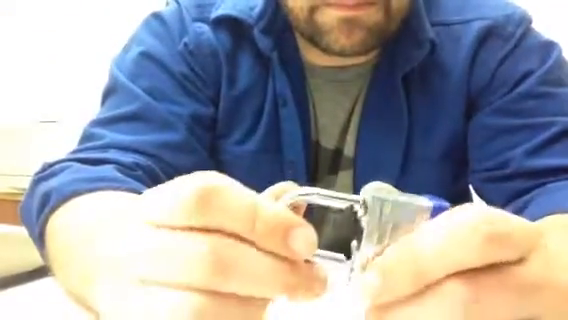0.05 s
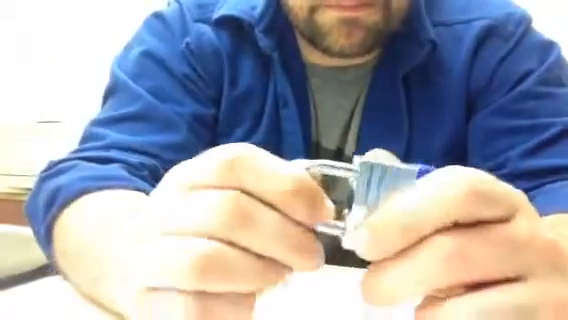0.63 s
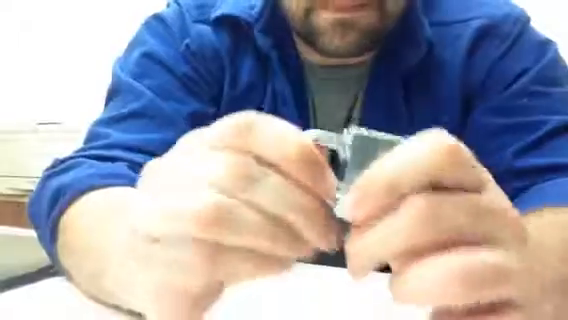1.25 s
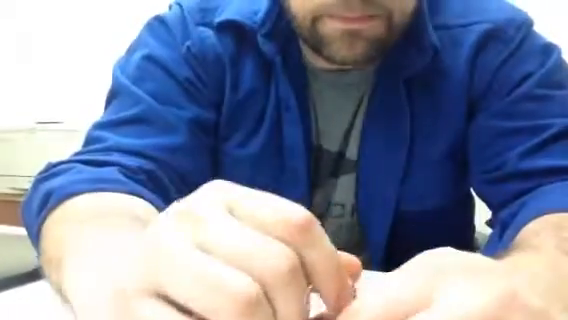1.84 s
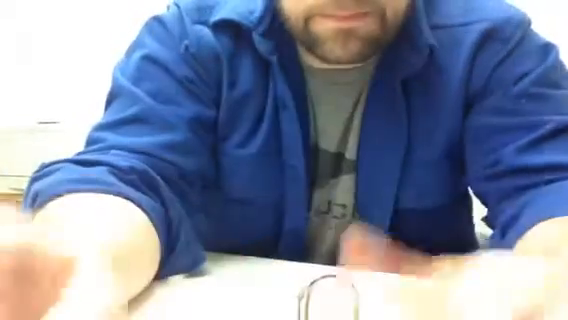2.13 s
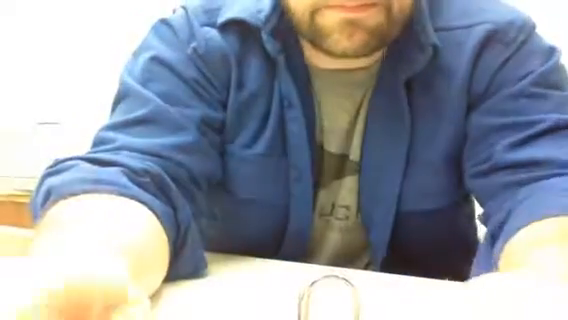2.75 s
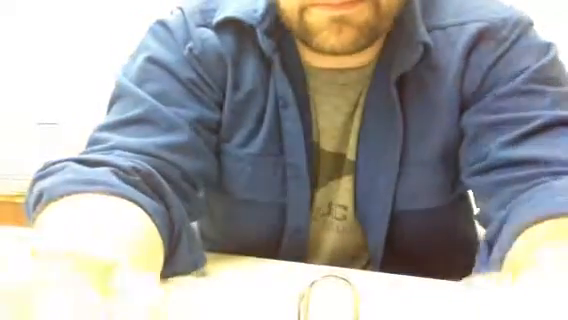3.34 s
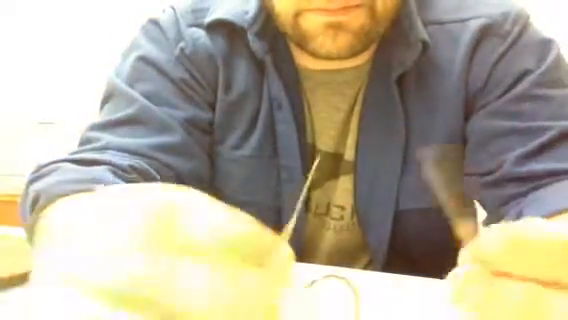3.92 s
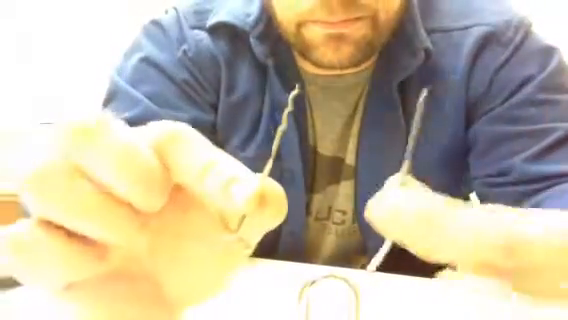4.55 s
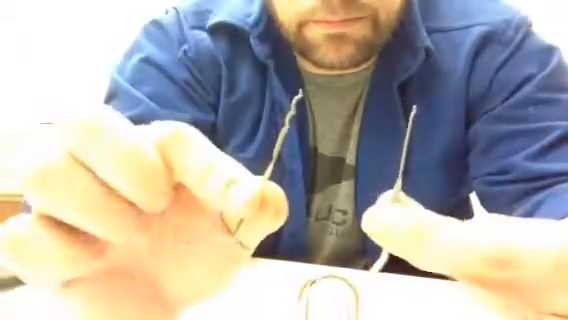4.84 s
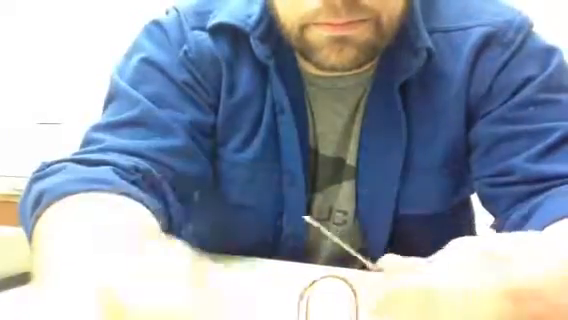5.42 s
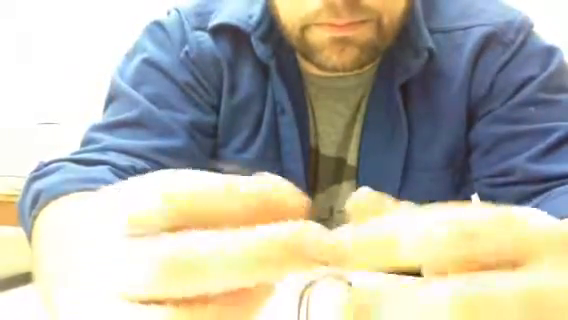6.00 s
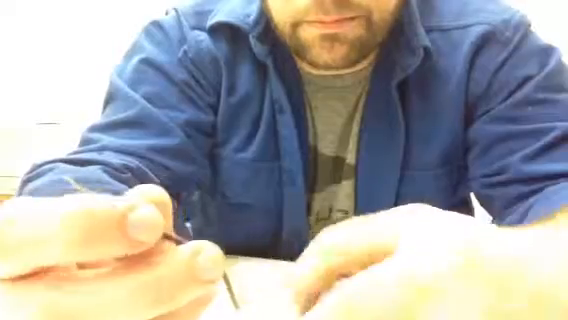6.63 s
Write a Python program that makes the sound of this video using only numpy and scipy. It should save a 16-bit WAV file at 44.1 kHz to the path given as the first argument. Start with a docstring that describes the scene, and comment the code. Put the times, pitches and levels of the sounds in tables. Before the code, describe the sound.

A padlock clacks shut and knocks onto a table, then thin steel picks tap and one drops with a jingle.

```python
"""A small room, one close microphone at a table, a fan humming low throughout.
First a padlock, held up in the hand, is snapped shut and tugged so that its shackle clacks on the body.
Near 1.8 s it is set down close to the microphone and the table top knocks. Hands slide over the top
and gather two thin steel picks, which scrape, tap, click under the nails and squeak faintly.
Near 5.4 s one pick is dropped and jingles to rest; last, the lock is nudged along the table."""
import sys
import numpy as np
from scipy import signal
from scipy.fft import rfft, irfft
from scipy.io import wavfile

SR = 44100
rng = np.random.default_rng(int(sys.argv[2]) if len(sys.argv) > 2 else 0)


def wrap_up_sound(samples):
    """Save the sound to the file named by the first command line argument, as 16-bit audio."""
    columns = np.atleast_2d(samples).T
    # keep every value between -1 and 1, then stretch to whole-number steps
    tamed = np.clip(columns, -1, 1)
    steps = np.round(tamed * 32767).astype(np.int16)
    wavfile.write(sys.argv[1], SR, steps)


N = 294147
TIME = np.arange(N) / SR

# Levels are relative within each table.
# spectra of the fan's rumble and rush: f/Hz, level/dB
FAN_RUMBLE = [(20, -34.5), (35, -20), (52, -2), (80, -3.5), (140, -1.5), (180, -1), (215, -6), (310, -9.5),
              (420, -15), (560, -18.5), (800, -23.5), (1230, -31), (2700, -35), (5700, -42), (14500, -38.5)]
FAN_RUSH = [(120, -15), (300, -9), (410, 5.5), (560, -4), (740, -1), (950, -6.5)]
# tones of the fan's hum: f/Hz, level/dB
FAN_HUM = [(53, -65), (175, -60.5), (400, -78)]
# loose parts ticking as the lock is moved: t/s, level/dB, decay/ms
LOCK_TICKS = [(0.1203, -60.5, 4.4), (0.1896, -63, 11), (0.432, -61.5, 2.6), (0.767, -57, 2.2),
              (1.002, -55, 1.8), (1.248, -62, 4.4), (1.8366, -34.5, 1.6), (1.92, -46, 1.6),
              (1.9325, -41, 1), (6.182, -62, 1.35)]
# shackle striking the lock body: t/s, level/dB, thud re level/dB, decay/ms, shackle f/Hz,
# shackle gain/dB, spring f/Hz, spring gain/dB, lead of the free-play tick/ms
SHACKLE_CLACKS = [(0.2115, -12.5, 0, 1.54, 3780, 3.5, 10450, 7.5, 4),
                  (0.217, -24, -16, 2.2, 3500, 1, 13300, 6, -7),
                  (0.267, -13, 3.5, 2, 4270, 0.5, 9800, -16, 5),
                  (0.2696, -26, 1.5, 2.8, 4800, -4, 14000, 1, 5),
                  (0.4951, -32.5, -29, 1.8, 3880, 2, 14500, 12, 2.5),
                  (0.787, -25, -27, 1.5, 4370, 7, 14700, 8, 8.5),
                  (0.9058, -23.5, -1.5, 1.94, 3600, 2, 13500, 3, 1.5),
                  (1.041, -22.5, -10, 1.05, 3700, 8, 13400, 2, 6.5),
                  (1.1345, -21.5, 0, 1.8, 4530, -2, 13600, 4, 5.5),
                  (1.2742, -28, 3.5, 1.62, 6300, 8, 12500, -14, 8),
                  (1.3918, -27.5, -8, 2.86, 4200, -10, 12800, -6, 10.5)]
# faint after-ring of the shackle: f/Hz, level/dB, t60/s
SHACKLE_MODES = [(3010, -9.5, .18), (4200, -2.5, .2), (4440, 0, 0.093), (4900, -6.5, 0.2), (7300, -1.5, .2),
                 (8400, -6, .2)]
# spectrum of the lock's bright steel: f/Hz, level/dB
STEEL_COLOUR = [(600, -30.5), (1000, -16), (1500, -15.5), (2200, -13.5), (3200, -6.5), (5500, -7.5),
                (6700, -3), (9400, -1), (11400, -2), (13000, 0), (15300, -6)]
# spectrum of the lock body's thud: f/Hz, level/dB
THUD_COLOUR = [(100, -19), (250, -6), (450, 2.5), (800, -9), (1500, -6.5), (2600, -14.5)]
# spectrum of the room's tail: f/Hz, level/dB
TAIL_COLOUR = [(200, -13), (1500, -0.5), (4500, -2.5), (8000, -2.5), (15000, -2)]
# spectrum of the clacks scattered back by the room: f/Hz, level/dB
SCATTER_COLOUR = [(200, -14.5), (1200, -13.5), (2400, -10), (3400, -7), (4600, 0.5), (6000, -3.5),
                  (7700, -1), (10000, 0), (13000, 1.5), (15000, 2.5)]
# blows on the table top: t/s, level/dB, contact low-pass f/Hz
TABLE_KNOCKS = [(1.8360, -20.5, 2350), (1.9157, -19.5, 1500), (1.919, -29, 1390), (1.9286, -18, 1000),
                (1.9323, -22.5, 1480), (1.9392, -27, 1300), (5.241, -32, 654)]
# modes of the table top: f/Hz, level/dB, t60/s
TABLE_MODES = [(178.6, -3.5, 0.17), (240, -1.5, 0.15), (336, -11, 0.076), (390.5, 1.5, 0.076),
               (483, -2.5, 0.1), (546, -11.5, 0.16), (637.7, -11.5, 0.37), (720, -2, 0.11), (758, -1, 0.13),
               (842, -11, 0.2), (924, -8, 0.15), (962.5, -1.5, 0.089), (1052, -7.5, .05), (1177, -2, 0.085),
               (1275, -17.5, 0.093), (1355, -12.5, 0.074), (1660, -27, 0.086), (1878, -34.5, 0.036)]
# the lock dragged over the table: start t/s, length/s, level/dB
LOCK_DRAGS = [(1.837, 0.068, -33.5), (1.937, 0.069, -45), (6.47, 0.11, -31), (6.65, 0.036, -38.5)]
# spectra of a knock and of a drag: f/Hz, level/dB
KNOCK_COLOUR = [(90, -3), (220, -5), (900, -1), (1500, -10.5), (2400, -18), (6000, -17)]
DRAG_COLOUR = [(100, -10), (210, -11), (380, 2.5), (480, 4), (700, -7.5), (1200, -8), (1900, -9),
               (2500, -21), (6000, -32.5), (12000, -37)]
# hands sweeping the table: start t/s, length/s, fastest point/share of length, level/dB, treble/dB
HAND_STROKES = [(1.937, 0.77, 0.67, -63, -8.5), (2.824, 0.4, 0.34, -58, -15), (3.429, 0.29, 0.28, -59, -11),
                (3.818, .27, 0.27, -62, -9)]
# spectrum of friction on the table: f/Hz, level/dB
RUB_COLOUR = [(880, -33), (1500, -3.5), (2090, -1), (3060, -2), (4850, -2), (6010, -5.5), (12900, -3.5),
              (14300, -1), (15500, -6.5)]
# picks scraping over the table: start t/s, length/s, level/dB, treble/dB, ring re level/dB
PICK_SCRAPES = [(2.46, 0.13, -60, -7, -9), (2.767, 0.069, -75.5, -1, -15), (3.178, 0.044, -58.5, -1, -4),
                (3.247, 0.1, -72.5, -6, -13), (3.35, .06, -71, 5, -20), (3.586, .045, -55, 0, -18),
                (3.654, 0.023, -65, 3, -15), (3.71, 0.1, -73.5, -4.5, -18)]
# modes of a steel pick: f/Hz, level/dB, t60/s
PICK_MODES = [(3660, -3.5, .17), (4922, -9, .1), (8376, -16, .13), (9320, -8, .13), (11803, 0, .13),
              (14088, 0, .14)]
# picks striking the table: t/s, tap level/dB, ring level/dB, decay/ms, f/Hz favoured by the contact
PICK_CONTACTS = [(2.475, -58, -68, 3.3, 9320), (2.5363, -49, -58, 2.2, 11800), (2.56, -45, -54, 3, 9320),
                 (2.585, -44.5, -53, 3, 11800), (2.607, -46, -67, 2, 11800), (3.583, -33, -40, 5.5, 11800),
                 (3.601, -34.5, -48, 5.2, 9320), (5.2259, -25.5, -55, 1.7, 5010),
                 (5.2424, -38, -60, 3.3, 4922), (5.360, -36, -38, 4.3, 14090),
                 (5.3687, -12, -27, .8, 12100), (5.3841, -20, -25.5, 1, 14090), (5.393, -25, -32, .9, 3660)]
# spectrum of a pick's tap: f/Hz, level/dB
TAP_COLOUR = [(500, -6), (1200, -14.5), (2000, -4), (3300, -8), (5000, -1.5), (7000, -2.5), (9500, 1.5),
              (12000, -3), (15000, -5)]
# fingernails on a pick that lies flat: t/s, level/dB, decay/ms, low-cut f/Hz
NAIL_CLICKS = [(3.182, -39, 1.6, 1500), (3.2512, -35.5, 0.91, 7000), (3.265, -49, 1.5, 7000),
               (3.409, -31.5, 1.53, 200), (3.7221, -61.5, 1.8, 5000)]
# resonances of that damped pick: f/Hz, width/Hz, level/dB
FLAT_PICK_BANDS = [(780, 61, 8.5), (3280, 1200, -9), (7380, 540, -9), (11000, 1230, 2.5), (14300, 650, -14)]
# sliding steel squeaking: start t/s, length/s, top of the pitch arch t/s, its f/Hz, level/dB
PICK_SQUEAKS = [(3.735, .085, 3.705, 15200, -69), (3.87, 0.32, 3.96, 14800, -69.5)]


def undb(db):
    """Decibels to gain."""
    return 10 ** (np.asarray(db) / 20)


def unit(x):
    """Scale to rms 1."""
    return x / np.sqrt(np.mean(x ** 2))


def add(track, s, sound):
    """Mix a sound in at time s."""
    i = int(s * SR)
    track[i:i + len(sound)] += sound[:N - i]


def colour(x, points, size=2048):
    """Causal filter through (f/Hz, level/dB) points that keeps the power of white noise."""
    hz, db = np.transpose(points)
    grid = np.maximum(np.fft.rfftfreq(size, 1 / SR), 1)
    cepstrum = irfft(np.log(undb(np.interp(np.log(grid), np.log(hz), db))))
    cepstrum[1:size // 2] *= 2  # fold to minimum phase
    cepstrum[size // 2 + 1:] = 0
    response = irfft(np.exp(rfft(cepstrum)))
    return signal.fftconvolve(x, response / np.linalg.norm(response))[:len(x)]


def cut(x, hz, kind="low", order=2):
    """Low- or high-pass."""
    return signal.sosfilt(signal.butter(order, hz, kind, fs=SR, output="sos"), x)


def resonate(x, hz, width):
    """One broad resonance with gain 1 at its centre."""
    return signal.lfilter(*signal.iirpeak(hz, hz / width, fs=SR), x)


def walk(rate):
    """Random wander of rms 1, with `rate` turns a second."""
    knots = rng.standard_normal(int(N / SR * rate) + 2)
    return unit(np.interp(TIME * rate, np.arange(len(knots)), knots))


def patter(rate, spread_db):
    """Tiny impacts at random moments, about `rate` a second."""
    return (rng.random(N) < rate / SR) * undb(spread_db * rng.standard_normal(N))


def crack(decay_ms, rise_ms=0.15):
    """Countless damped modes struck at once: a noise burst that dies in milliseconds."""
    ms = TIME[:SR // 2] * 1000
    shape = np.exp(-ms / decay_ms) * (1 - np.exp(-ms / rise_ms))
    burst = shape * rng.standard_normal(len(ms))
    return burst * np.linalg.norm(shape) / np.linalg.norm(burst)


def ring(modes, scatter_db):
    """Decaying modes; each point of contact shares the blow among them differently."""
    t = TIME[:SR // 2]
    hz, db, t60 = np.transpose(modes)[:, :, None]
    size = undb(db + scatter_db * rng.standard_normal(hz.shape))
    phase = 2 * np.pi * rng.random(hz.shape)
    partials = size * np.sin(2 * np.pi * hz * t + phase) * undb(-60 * t / t60)
    return partials.sum(axis=0) / np.linalg.norm(size)


def push(start, length, attack_s, release_s):
    """Envelope of a short shove: a quick rise, a hold, then it dies away."""
    rise = np.clip((TIME - start) / attack_s, 0, 1)
    return rise * np.exp(-np.maximum(TIME - start - length, 0) / release_s)


def sweep(start, length, fastest=0.37):
    """Speed of a movement that gathers pace and comes to rest again, 0-1."""
    turn = np.interp(TIME, [start, start + fastest * length, start + length], [0, 0.5, 1])
    return np.abs(np.sin(np.pi * turn))


def fan():
    """Behind everything: steady rumble and faint hiss, a swelling rush of air, a wavering hum."""
    rumble = undb(-58.5) * unit(colour(rng.standard_normal(N), FAN_RUMBLE, size=8192))
    rush = unit(cut(colour(rng.standard_normal(N), FAN_RUSH), 954, order=14))
    rush_db = -62.3 + 1.3 * walk(3) + 1.6 * walk(14)  # slow swell and quicker flutter
    hum = sum(undb(db + 2 * walk(11)) * np.sin(2 * np.pi * np.cumsum(hz + 3 * walk(12)) / SR)
              for hz, db in FAN_HUM)
    return rumble + undb(rush_db) * rush + hum


def padlock():
    """The shackle clacks, the body thuds, loose parts tick; the grip shifts each clack's short rings."""
    steel, body, after_ring = np.zeros((3, N))
    for s, db, thud_db, decay_ms, shackle_hz, shackle_db, spring_hz, spring_db, lead_ms in SHACKLE_CLACKS:
        rise_ms = 0.43 * decay_ms
        blow = undb(db) * crack(decay_ms, rise_ms)
        shackle = undb(shackle_db) * resonate(blow, shackle_hz, width=520)
        spring = undb(spring_db) * resonate(blow, spring_hz, width=800)
        add(steel, s - lead_ms / 1000, undb(-44.5) * crack(decay_ms=3.6))  # the shackle takes up its play
        add(steel, s, blow + shackle + spring)
        add(body, s, undb(db + thud_db) * crack(decay_ms, rise_ms))
        shiver_hz = 4400 * (1 + 0.11 * rng.uniform(-1, 1))  # the shackle shivers after each blow
        add(steel, s + 0.011, undb(db - 13.5) * resonate(crack(decay_ms=8.9), shiver_hz, width=280))
        add(after_ring, s, undb(db) * ring(SHACKLE_MODES, scatter_db=2.5))
    for s, db, decay_ms in LOCK_TICKS:
        add(steel, s, undb(db) * crack(decay_ms))
    clacks = undb(5.5) * colour(steel, STEEL_COLOUR)
    thuds = undb(-7.5) * colour(body, THUD_COLOUR)
    return clacks + thuds + undb(-29) * after_ring


def room(x, t60, wet_db, echo_s=0.0087, echo_db=-24):
    """The direct sound reaches the microphone with one early reflection and the small room's tail."""
    t = TIME[:SR // 2]
    envelope = undb(-60 * t / t60) * (1 - np.exp(-t / 0.00083))
    tail = envelope * colour(rng.standard_normal(len(t)), TAIL_COLOUR)
    tail *= undb(wet_db) / np.linalg.norm(tail)
    add(tail, echo_s, np.array([undb(echo_db)]))
    return x + signal.fftconvolve(x, tail)[:N]


def diffuse(x, t60, wet_db):
    """Sound sent in all directions comes back as smooth noise whose power builds up and dies away."""
    t = TIME[:SR // 2]
    decay = (undb(-60 * t / t60) * (1 - np.exp(-t / 0.0026))) ** 2
    power = signal.fftconvolve(x ** 2, decay / decay.sum())[:N]
    return undb(wet_db) * np.sqrt(np.abs(power)) * colour(rng.standard_normal(N), SCATTER_COLOUR)


def table_top():
    """Close to the microphone the heavy lock lands and rocks; when dragged, it sticks and slips."""
    board = np.zeros(N)
    for s, db, contact_hz in TABLE_KNOCKS:
        blow = undb(3) * colour(crack(decay_ms=3.93), KNOCK_COLOUR)
        knock = blow + undb(-0.5) * ring(TABLE_MODES, scatter_db=2)
        add(board, s, undb(db) * cut(knock, contact_hz))
    slips = patter(rate=900, spread_db=0.5)
    slip_response = ring(TABLE_MODES, scatter_db=2) + undb(-1) * crack(decay_ms=3.8)
    judder = signal.fftconvolve(slips - slips.mean(), slip_response)[:N]
    judder = unit(colour(judder, DRAG_COLOUR))
    for start, length, db in LOCK_DRAGS:
        board += undb(db) * push(start, length, attack_s=0.023, release_s=0.021) * judder
    return cut(board, 114, "high")  # the board radiates little bass


def rubbing(hiss, db, treble_db):
    """Friction hiss at a level, with its top octave raised or lowered."""
    treble = undb(5.5 + treble_db) * cut(hiss, 9100, "high")
    return undb(db) * (cut(hiss, 8200) - treble)  # the two halves cross over in opposite phase


def hands():
    """Skin and cloth rub over the table: a fine hiss that follows the speed of the hand."""
    catches = patter(rate=680, spread_db=3.5) * rng.standard_normal(N)
    hiss = unit(colour(rng.standard_normal(N) + undb(-10) * unit(catches), RUB_COLOUR))
    return sum(sweep(start, length, fastest) * rubbing(hiss, db, treble_db)
               for start, length, fastest, db, treble_db in HAND_STROKES)


def pick_scrapes():
    """Steel catches on the grain of the table: a gritty hiss that sets the pick ringing."""
    catches = patter(rate=700, spread_db=0.5) * rng.standard_normal(N)
    grit = unit(catches) + undb(0.5) * rng.standard_normal(N)
    hiss = unit(colour(grit, RUB_COLOUR))
    ringing = unit(signal.fftconvolve(grit, ring(PICK_MODES, scatter_db=2))[:N])
    out = np.zeros(N)
    for start, length, db, treble_db, ring_db in PICK_SCRAPES:
        scrape = rubbing(hiss, db, treble_db) + undb(db + ring_db) * ringing
        out += push(start, length, attack_s=0.0085, release_s=0.011) * scrape
    return out


def pick_taps(rest_s=5.575):
    """Thin steel strips tap the table and ring on between contacts; the dropped one bounces to rest."""
    taps, rings = np.zeros((2, N))
    contacts = [(*hit, 0) for hit in PICK_CONTACTS] + list(bounces())
    for s, db, ring_db, decay_ms, favoured_hz, tilt_db in contacts:
        hz, mode_db, t60 = np.transpose(PICK_MODES)
        emphasis_db = tilt_db * np.log2(hz / favoured_hz) + 7 * np.exp(-((hz - favoured_hz) / 900) ** 2)
        modes = np.column_stack([hz, mode_db + emphasis_db, t60])
        add(taps, s, undb(db) * crack(decay_ms, rise_ms=0.054))
        rings[int(s * SR):] = 0  # each contact stops the old vibration and starts a new one
        add(rings, s, undb(ring_db) * ring(modes, scatter_db=1.5))
    damping = np.exp(-np.maximum(TIME - rest_s, 0) / 0.016)  # the table damps the pick once it lies still
    return colour(taps + chatter(), TAP_COLOUR) + rings * damping


def nails():
    """Dry clicks: the table and the finger damp the pick at once; a glancing touch is thinner."""
    clicks = np.zeros(N)
    for s, db, decay_ms, low_cut_hz in NAIL_CLICKS:
        add(clicks, s, undb(db) * cut(crack(decay_ms), low_cut_hz, "high"))
    return undb(8.5) * sum(undb(db) * resonate(clicks, hz, width) for hz, width, db in FLAT_PICK_BANDS)


def pick_squeaks(bend_hz_per_s2=120000):
    """A pick drawn off the table whistles faintly, sinking in pitch as it slows."""
    out = np.zeros(N)
    for start, length, top_s, top_hz, db in PICK_SQUEAKS:
        arch_hz = np.maximum(top_hz - bend_hz_per_s2 * (TIME - top_s) ** 2, 0)
        hz = arch_hz * (1 + 0.0074 * walk(900))
        out += undb(db) * sweep(start, length) ** 2 * np.sin(2 * np.pi * np.cumsum(hz) / SR)
    return out


def chatter(start=5.366, length=0.18, sag_db_per_s=36):
    """The dropped pick buzzes finely on the table between its bounces."""
    pulses = signal.fftconvolve(patter(rate=710, spread_db=0), np.exp(-TIME[:SR // 20] / 0.0038))[:N]
    buzz = unit(pulses * rng.standard_normal(N))
    db = -38.5 - sag_db_per_s * np.maximum(TIME - start, 0)
    return undb(db) * push(start, length, attack_s=0.0039, release_s=0.02) * buzz


def bounces(s=5.4065, first_flight_s=0.0435, rebound=0.81, decay_ms=0.9, favoured_hz=13000):
    """The dropped pick lands ever sooner and weaker: rows as in PICK_CONTACTS, plus tilt/(dB/octave)."""
    for k in range(8):
        tap_db, ring_db = -24.5 - 3 * k, -27 - 3 * k
        tilt_db = 2.5 * k  # it lies flatter each time, so its low modes fade
        yield s, tap_db, ring_db, decay_ms, favoured_hz, tilt_db
        s += first_flight_s * rebound ** k


def scene():
    """Mono: the lock held up in the open room, knocks and taps down on the table, friction heard dry."""
    lock = padlock()
    in_hand = room(lock, t60=0.17, wet_db=-17) + diffuse(lock, t60=0.17, wet_db=-14)
    on_table = room(pick_taps() + table_top() + nails(), t60=0.16, wet_db=-11.5)
    return (in_hand + on_table + hands() + pick_scrapes() + pick_squeaks() + fan())[None]


def record(dry):
    """The recorder drops the deepest bass and cuts the top steeply."""
    top_cut = signal.ellip(10, 0.2, 70, 15350, fs=SR, output="sos")
    return signal.sosfilt(top_cut, cut(dry, 39.68, "high", order=4))


dry = scene()
out = record(dry)
wrap_up_sound(out)
```